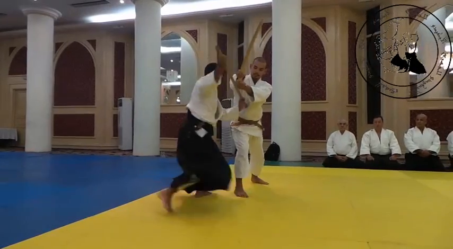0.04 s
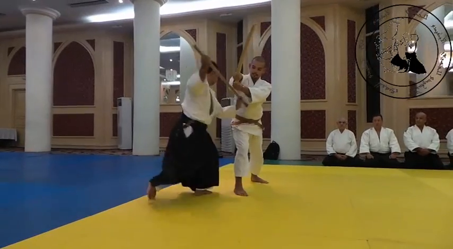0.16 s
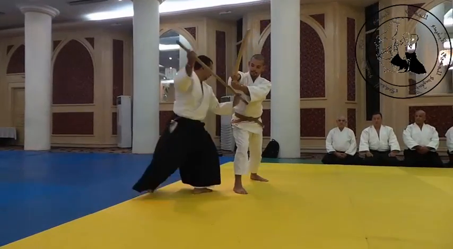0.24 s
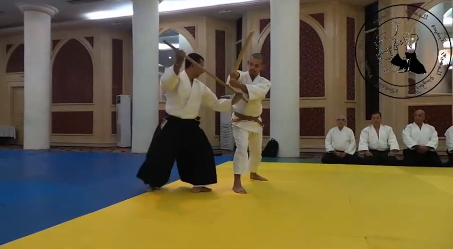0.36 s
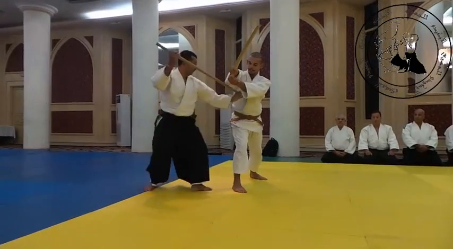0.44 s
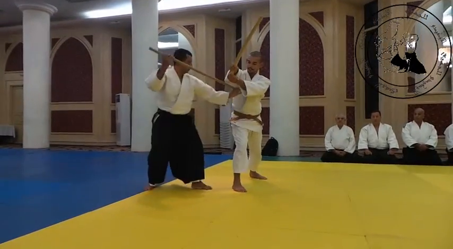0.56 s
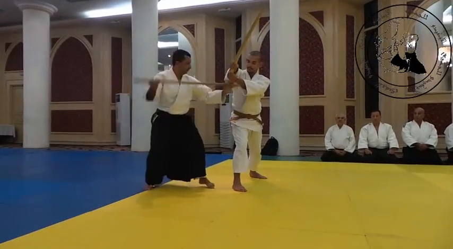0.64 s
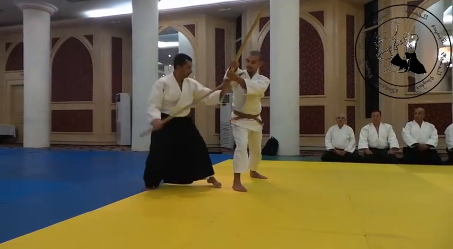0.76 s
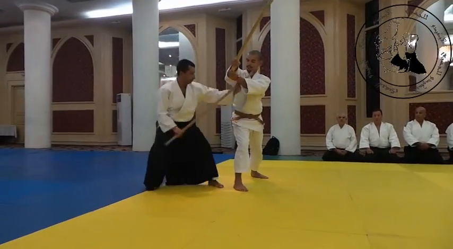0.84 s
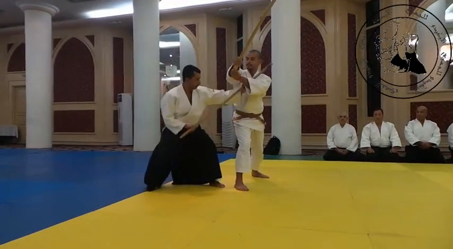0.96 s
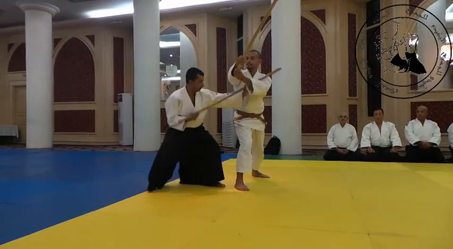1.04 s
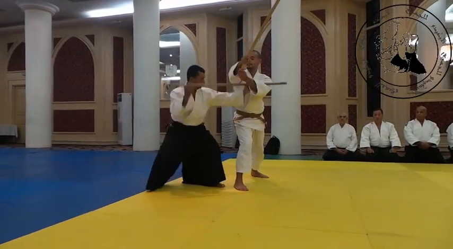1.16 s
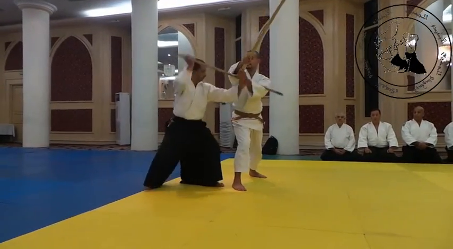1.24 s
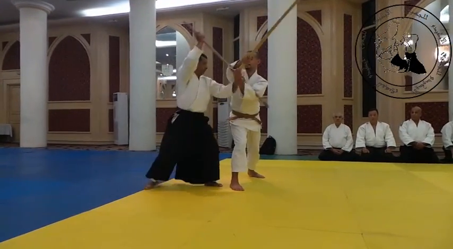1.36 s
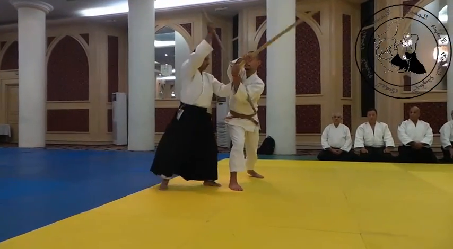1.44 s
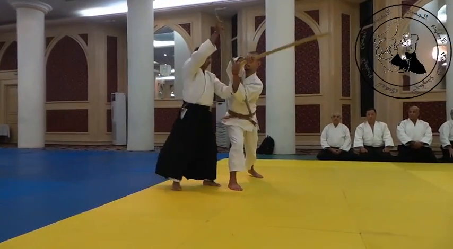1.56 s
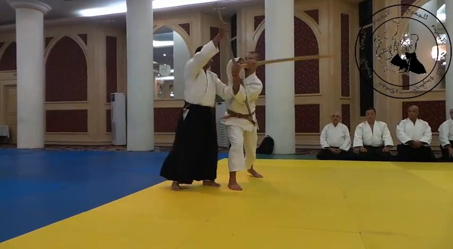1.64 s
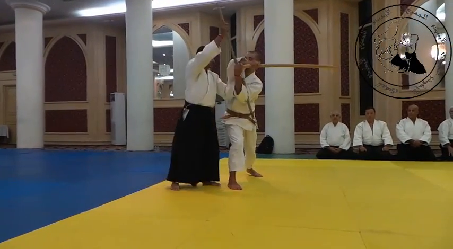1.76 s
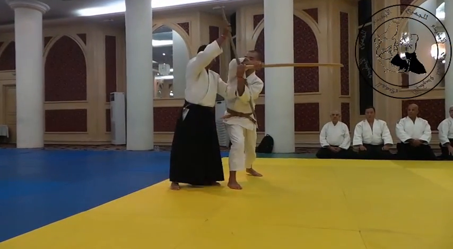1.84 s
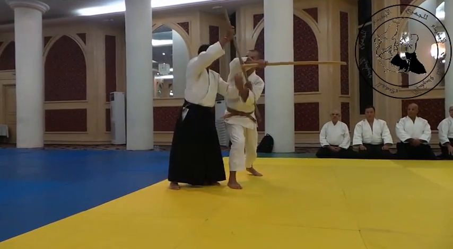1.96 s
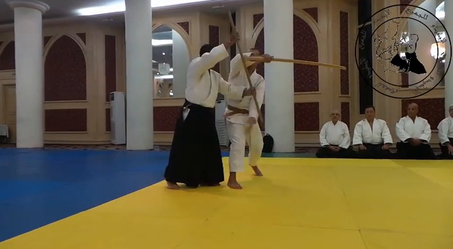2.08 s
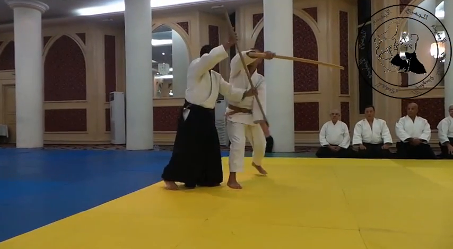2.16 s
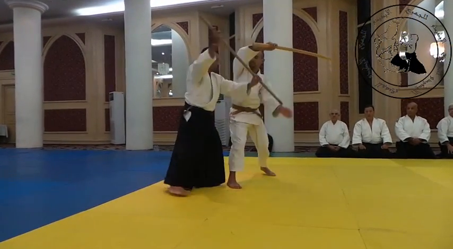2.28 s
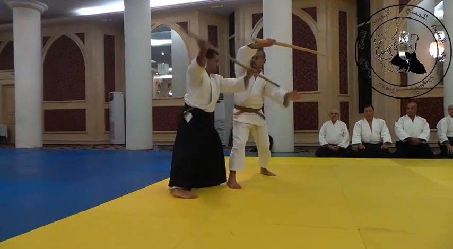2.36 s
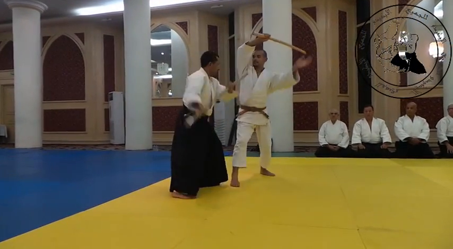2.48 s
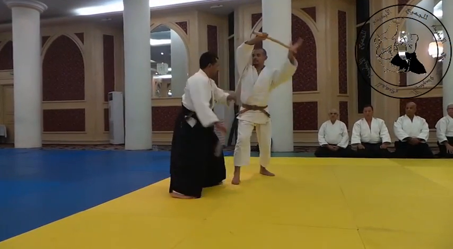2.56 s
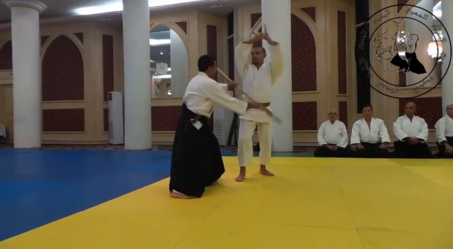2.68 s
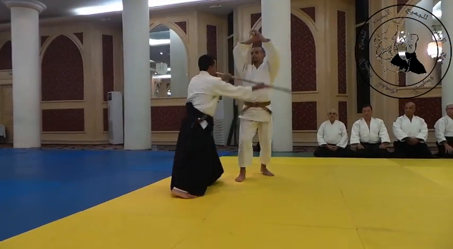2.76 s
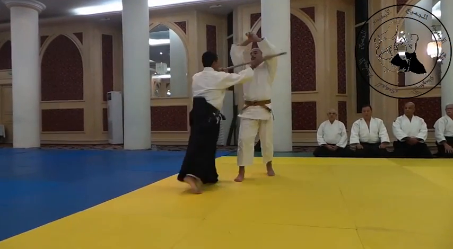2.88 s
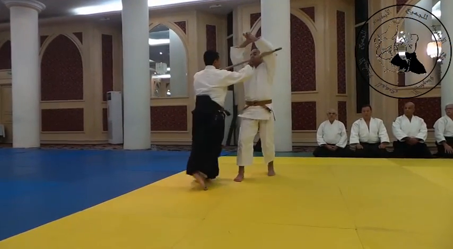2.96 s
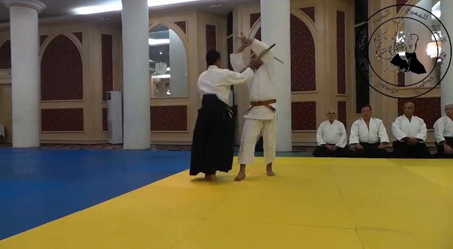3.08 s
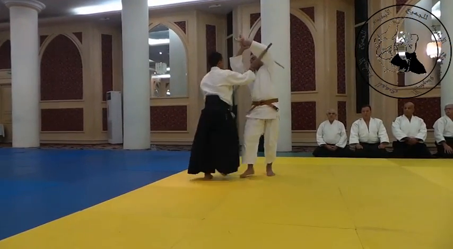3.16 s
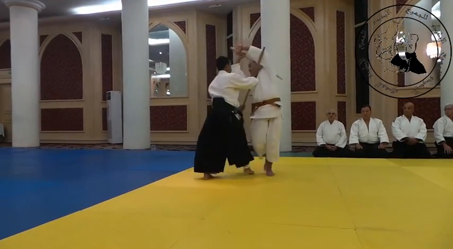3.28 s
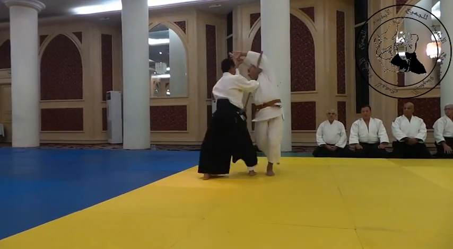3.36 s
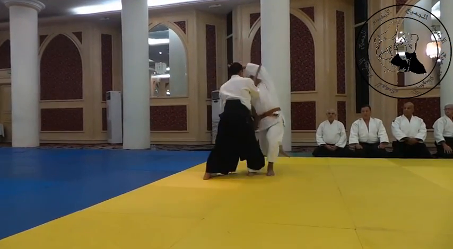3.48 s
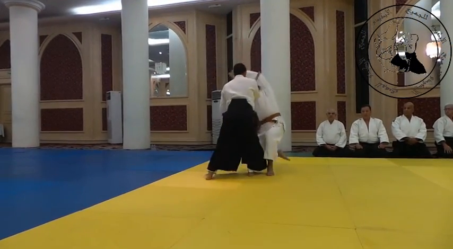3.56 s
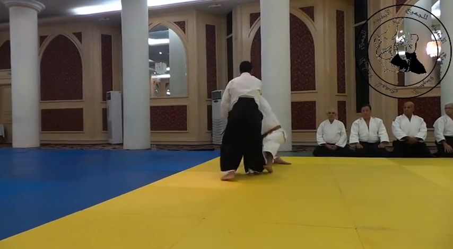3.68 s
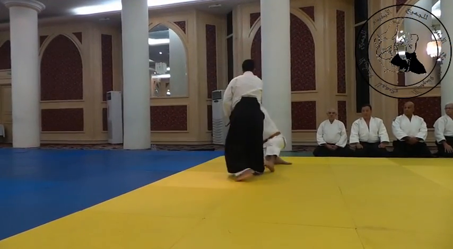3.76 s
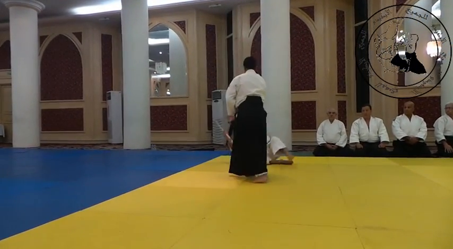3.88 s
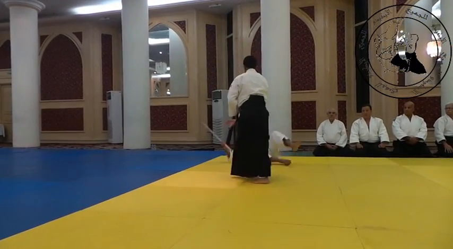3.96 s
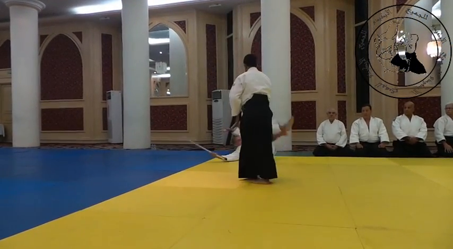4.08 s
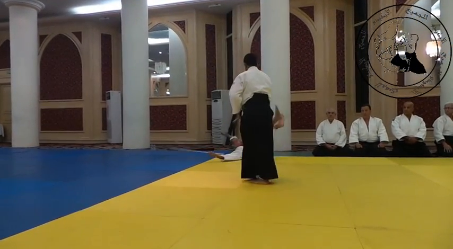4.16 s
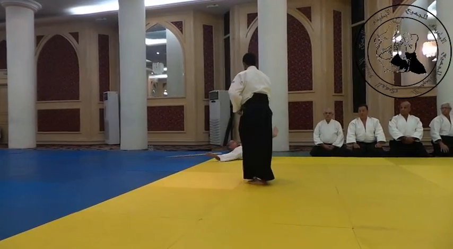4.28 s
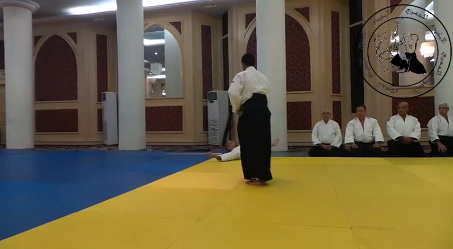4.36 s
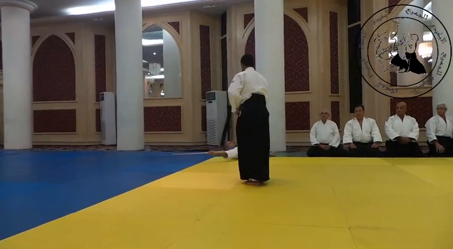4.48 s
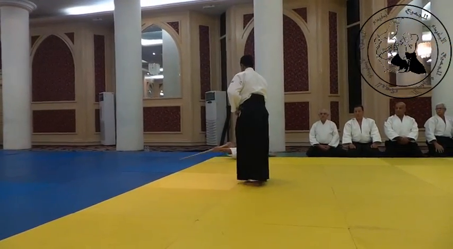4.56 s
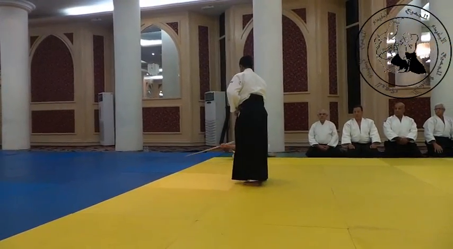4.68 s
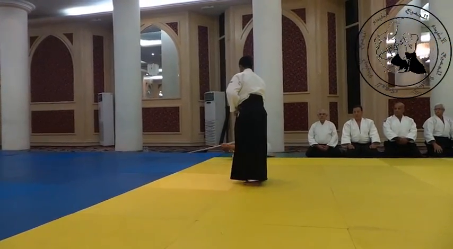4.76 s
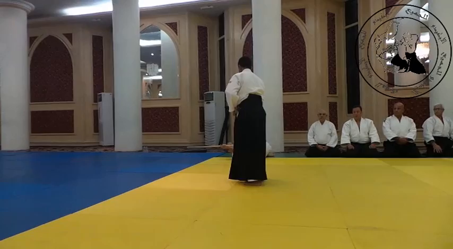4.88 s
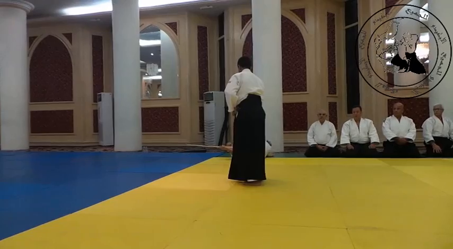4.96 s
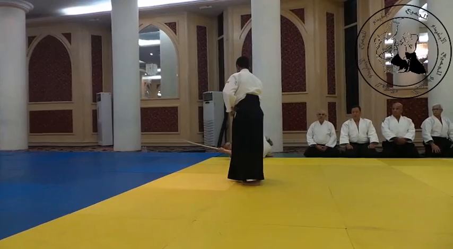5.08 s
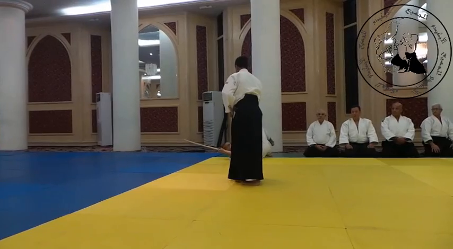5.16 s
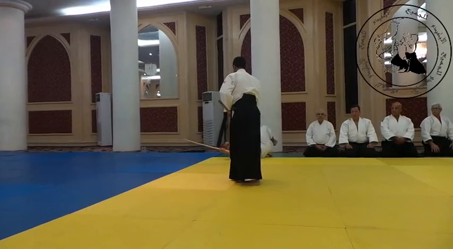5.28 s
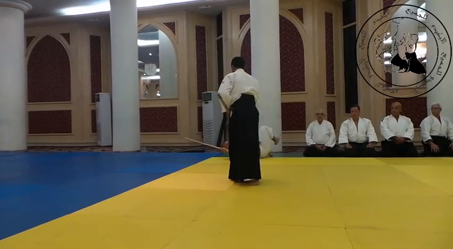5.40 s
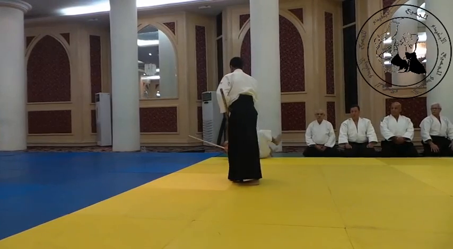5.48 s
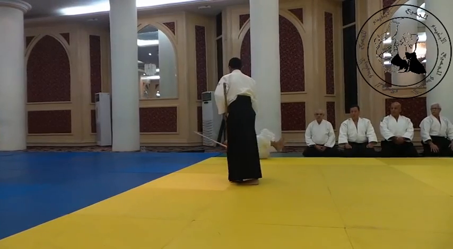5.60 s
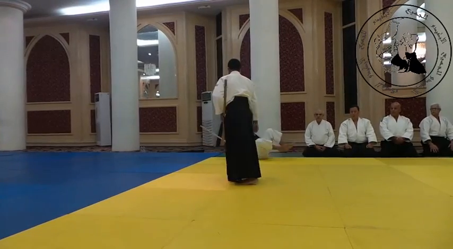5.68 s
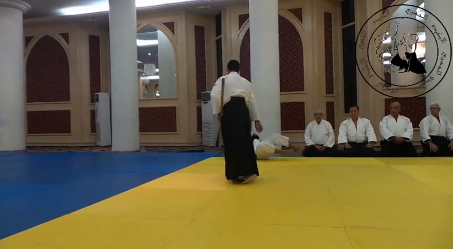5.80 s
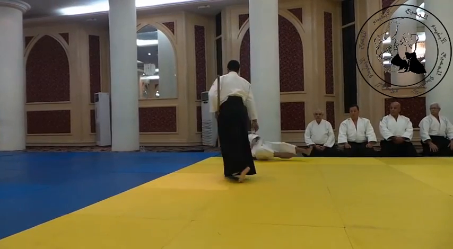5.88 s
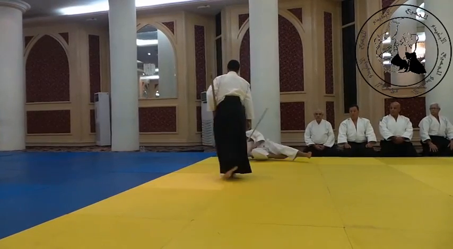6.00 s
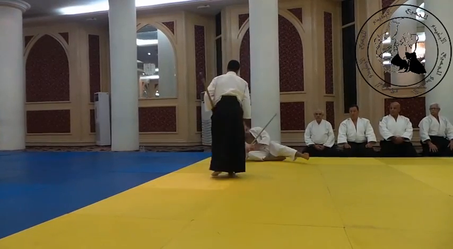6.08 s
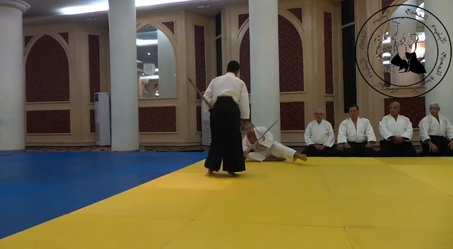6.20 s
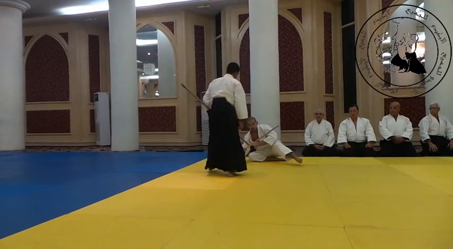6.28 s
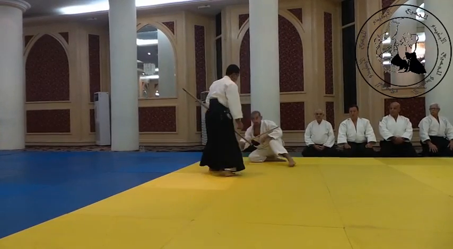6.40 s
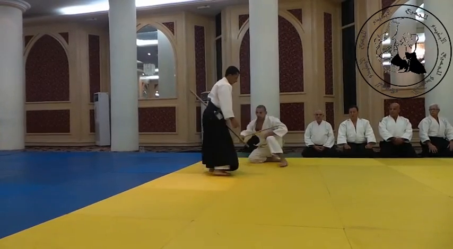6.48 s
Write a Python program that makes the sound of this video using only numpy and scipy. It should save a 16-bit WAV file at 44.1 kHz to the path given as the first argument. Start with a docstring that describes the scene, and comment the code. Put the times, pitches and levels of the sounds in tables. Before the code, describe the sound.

A hard barefoot stamp booms on padded mats, lighter steps and wooden taps follow, then a body falls heavily in a reverberant hall.

```python
"""Staff practice on hall mats

Two people work through a staff technique on padded mats in a large hall, heard from the centre.
Bare feet stamp and step as swinging foam thuds with noisy smacks; soles and cotton rub as swelling noise.
The staffs knock, and once scrape faintly, as short decaying sines. One partner is taken down and lands
flat, in hollow noise bursts. Mains hum made of steady tones and the hall's quiet air, a shaped noise,
lie underneath."""
import sys
import numpy as np
from scipy import signal
from scipy.fft import irfft
from scipy.io import wavfile

SR = 44100
rng = np.random.default_rng(int(sys.argv[2]) if len(sys.argv) > 2 else 0)


def master_out(mix):
    """Clip the mix to full scale and print it as 16-bit PCM to the path in sys.argv[1]."""
    frames = np.transpose(np.atleast_2d(mix))
    ceiling = np.clip(frames, -1, 1)
    pcm = np.round(ceiling * 32767).astype(np.int16)
    wavfile.write(sys.argv[1], SR, pcm)


N = 288403
TIME = np.arange(N) / SR   # seconds

# mains hum, before its waver: pitch_hz, level_db [dB rms]
HUM = [(100, -61.5), (200, -73), (300, -87.5), (500, -88)]
# spectrum of the still air: frequency_hz, relative_level_db
AIR_COLOUR = [(20, -22), (50, -8), (100, -9), (160, -6.5), (290, -9.5), (400, -16.5), (600, -18.5),
              (1000, -24), (2500, -29.5), (6000, -32.5), (14500, -31.5)]
AIR_DB = -66   # rms
# the hall's tail: frequency_hz, reverberant_to_direct_db, t60_s
HALL = [(50, 2, 1.8), (97, 4.5, 1.09), (157, -10, 0.99), (286, 0, 1.04), (550, -0.5, 0.91), (1200, 1, 0.91),
        (2500, -2, 0.81), (6000, -5, 0.83), (14000, -3.5, 0.39)]
# early returns off ceiling and pillars: delay_s, level_db
ECHOES = [(.017, -5), (0.041, -17)]

# light wooden knocks and a faint tonal scrape (at 2.18 s), before the contact softens them:
# start_s, level_db, pitch_hz, t60_s
KNOCKS = [(.541, -48, 739, 0.15), (0.971, -29.5, 1020, 0.0036), (1.508, -57, 1066, 0.021),
          (1.794, -24.5, 1970, 0.0048), (2.183, -59, 1246, 0.078), (5.399, -58.5, 956, .073)]
# bending modes of a staff: multiple_of_pitch [ratio], relative_level_db
WOOD_MODES = [(0.999, 7.5), (2.05, -7), (3.3, -22)]

# sleeves whipping through a quick move: peak_s, level_db, length_s, dull_above_hz
SWISHES = [(0.166, -44, 0.065, 10500), (0.313, -44, .036, 14000), (0.388, -55, 0.048, 10100),
           (2.311, -62.5, 0.029, 9000), (2.658, -59, .07, 4040), (2.783, -53.5, .05, 5130),
           (3.163, -46, 0.037, 10200), (3.24, -66, 0.029, 8000), (3.456, -62.5, 0.023, 10000),
           (4.17, -66, 0.16, 8200), (4.764, -57, 0.032, 7950)]
# soles and heavy cotton rubbing on the mat: peak_s, level_db, length_s, dull_above_hz
SCUFFS = [(0.06, -62.5, 0.17, 5600), (0.094, -48.5, .026, 10000), (.59, -54, 0.071, 5400),
          (0.961, -62, 0.035, 6070), (1.413, -63.5, 0.044, 6000), (2.167, -60.5, 0.054, 7140),
          (2.258, -74, .08, 1900), (2.52, -59, 0.057, 11000), (2.643, -59, 0.082, 6500),
          (3.059, -61.5, 0.24, 8300), (3.347, -64, 0.041, 990), (3.769, -46.5, .045, 6000),
          (3.834, -47, .08, 7900), (3.985, -46, .067, 10100), (4.161, -49.5, .13, 1850),
          (4.413, -50.5, 0.064, 7900), (4.525, -42, 0.12, 6700), (5.296, -74.5, .06, 8050),
          (5.739, -72.5, .06, 6000), (6.143, -67, .12, 4960), (6.241, -59, .07, 4500),
          (6.472, -67.5, 0.092, 7000)]
# spectrum of all rubbing: frequency_hz, relative_level_db
SCUFF_COLOUR = [(100, -24), (300, 18), (700, 9.5), (1200, -1.5), (1800, -0.5), (2600, 0), (4000, -2.5),
                (7000, 0), (15000, 1)]
SWISH_THIN_HZ, SCUFF_THIN_HZ = 1900, 503   # bass rolls off below
RISE_SHARE = 0.4   # part of a rub's length spent speeding up

# spectrum of the dragged sole: frequency_hz, relative_level_db
DRAG_COLOUR = [(200, 0.5), (800, -8.5), (1300, -8.5), (1750, 6.5), (2300, 2.5), (3100, 1.5), (4000, 2),
               (7000, 0.5), (11000, -2.5), (15000, -10.5)]
# one sole gets up to speed, slides on, then slows
DRAG_S, DRAG_DB, DRAG_ATTACK_S, DRAG_HOLD_S, DRAG_RELEASE_S = 1.527, -39, 0.055, 0.12, 0.083
DRAG_STOP_S = 0.36   # about this long after its start the sole comes to rest

# spectrum of skin on the mat cover: frequency_hz, relative_level_db
SLAP_COLOUR = [(100, 18.5), (300, 2.5), (600, 5.5), (1000, 1.5), (1700, -1.5), (2800, 0.5), (4000, -4.5),
               (8000, -5), (15000, -6)]
SMACK_RISE_S, SLAP_THIN_HZ = 0.0009, 89   # time for the skin to settle, and where the bass rolls off
# sharp little ticks of skin and cloth on the cover: start_s, level_db
TICKS = [(2.308, -39.5), (4.384, -26.5), (4.3966, -30), (4.421, -37), (4.743, -35.5), (4.756, -37)]
TICK_RISE_S, TICK_DECAY_S, TICK_DULL_HZ = 0.0001, 0.0012, 10000
# the arm that beats the mat to break the fall
ARM_S, ARM_DB, ARM_DECAY_S = 4.4711, -23.5, 0.0067

# bare feet landing, and the low body of a staff knock (at 0.968 s):
# start_s, thud_db, pitch_hz, smack_db, smack_dull_above_hz
FOOTFALLS = [(.086, -22, 161.3, -48, 9000), (.300, -34.5, 112, -49, 12000), (.445, -33.5, 102.4, -50, 3000),
             (.538, -39.5, 113, -45.5, 2980), (.945, -47, 124, -52, 5900), (.968, -53, 172, -51, 1500),
             (1.792, -43.5, 171, -48.5, 1200), (2.1775, -68, 170, -40.5, 2420),
             (2.272, -45, 179, -52, 1300), (2.426, -35.5, 143, -57, 1000),
             (2.495, -36.5, 183, -38.5, 13000), (2.509, -32.5, 142, -48, 10000),
             (2.909, -38, 127, -55, 1500), (2.988, -43, 152, -46.5, 9000), (3.049, -39.5, 176, -45, 2950),
             (3.141, -34.5, 145.6, -43, 7000), (3.245, -50.5, 137, -63, 4000),
             (3.342, -42.5, 181, -50, 900), (3.405, -42, 170, -45, 1500),
             (6.226, -35.5, 107.4, -39.5, 8800)]
# knees, hip, back and legs of the falling partner: start_s, thud_db, pitch_hz, smack_db, smack_dull_above_hz
BODY_BLOWS = [(3.7505, -14, 143.7, -30.5, 6060), (3.825, -31.5, 155, -41.5, 8950),
              (3.858, -24, 149, -43, 4000), (4.049, -28, 281, -37.5, 1100),
              (4.143, -23.5, 151.4, -41, 3500), (4.157, -38, 198, -46, 3000),
              (4.177, -26, 174, -46.5, 2500), (4.385, -19.5, 150.5, -40, 6000),
              (4.419, -21.5, 151, -43, 6000), (4.446, -22, 169, -47, 3000),
              (4.4625, -11, 138.3, -40.5, 2920), (4.490, -15.5, 154, -27, 6000),
              (4.554, -19, 130.7, -41, 3000)]
# the foam's second mode: multiple of the pitch, and loss in dB per octave of pitch above MAT_HZ
OVERTONE, OVERTONE_LOSS_DB, MAT_HZ = 2.04, 18.5, 140

# the whole sole stamped flat: its clap, then the settings of the thud under it
STAMP_S, STAMP_DB, STAMP_DECAY_S = 0.1093, -16.5, 0.0033
STAMP_THUD_S, STAMP_THUD_DB, STAMP_HZ = 0.1076, -11, 133.6
# spectrum of the stamp's clap: frequency_hz, relative_level_db
STAMP_COLOUR = [(100, 7), (200, 13), (290, 2), (440, -3), (600, 20.5), (740, 2.5), (900, 1), (1200, -11),
                (1700, 0.5), (2200, 4.5), (2700, 5.5), (3600, 0.5), (6000, -0.5), (15000, -11.5)]

# back and arms falling flat, squeezing out the air beneath: start_s, level_db, decay_s
FALL = [(4.4598, -16.5, 0.0056), (4.472, -21.5, 0.029), (4.522, -27.5, 0.019), (4.555, -22.5, 0.0026),
        (4.640, -26.5, 0.0047)]
# spectrum of the flat landing: frequency_hz, relative_level_db
FALL_COLOUR = [(100, -31), (200, 1.5), (275, 2.5), (400, -7.5), (490, 3), (570, 7.5), (700, -4),
               (900, -26.5), (1200, -19.5), (1550, -12), (2000, -18.5), (2600, -27.5), (4000, -21),
               (14000, -32.5)]

CUTOFF_HZ = 14750   # the top is cut above


def from_db(db):
    """Turn decibels into gain."""
    return 10 ** (np.asarray(db) / 20)


def at_hz(points, hz, column=1):
    """Read a table column on a log-frequency axis."""
    points = np.array(points)
    return np.interp(np.log(hz + 1e-9), np.log(points[:, 0]), points[:, column])


def noise(colour, size, thin_hz=0, dull_hz=np.inf):
    """Random-phase noise of rms 1 with the given spectrum, rolled off below thin_hz and above dull_hz."""
    hz = np.fft.rfftfreq(size, 1 / SR)
    rolloff = np.sqrt(1 + (hz / dull_hz) ** 4 + (thin_hz / (hz + 1)) ** 4)
    gain = from_db(at_hz(colour, hz)) / rolloff * (hz > 0)   # nothing at 0 Hz
    x = irfft(gain * np.exp(2j * np.pi * rng.random(len(hz))), size)
    return x / np.std(x)


def add(track, s, sound):
    """Mix a sound into the track from time s on."""
    start = max(round(s * SR), 0)
    track[start:start + len(sound)] += sound[:N - start]


def background():
    """Mains hum, steady tones that waver slightly in level, over the shaped noise of still air."""
    hum = np.zeros(N)
    for hz, db in HUM:
        hum += from_db(db) * np.sqrt(2) * np.sin(2 * np.pi * (hz * TIME + rng.random()))
    waver_db = np.interp(TIME, np.linspace(0, TIME[-1], 70), rng.standard_normal(70))
    return hum * from_db(waver_db) + from_db(AIR_DB) * noise(AIR_COLOUR, N)


def hall(x, gap_s=0.01, build_s=0.017):
    """Diffuse reflections build up after a short gap and die away band by band."""
    t = TIME[:3 * SR // 2]
    hz = np.fft.rfftfreq(len(t), 1 / SR)
    white = np.exp(2j * np.pi * rng.random(len(hz)))
    onset = 1 - np.exp(-np.maximum(t - gap_s, 0) / build_s)
    edges = np.geomspace(30, 16000, 19)
    tail = np.zeros(len(t))
    for low, high in zip(edges, edges[1:]):
        centre = np.sqrt(low * high)
        decay = from_db(-60 * t / at_hz(HALL, centre, 2))
        band = irfft(white * ((hz >= low) & (hz < high)), len(t)) * onset * decay
        # scale the band's energy to the table's reverberant-to-direct level
        unit_energy = np.sqrt(2 * (high - low) / SR / np.sum(band ** 2))
        tail += band * from_db(at_hz(HALL, centre)) * unit_energy
    return signal.fftconvolve(x, tail)[:N]


def early_echoes(x, dull_hz=3500):
    """The nearest surfaces throw the sound back, later and duller."""
    dulled = signal.sosfilt(signal.butter(1, dull_hz, fs=SR, output="sos"), x)
    return sum(from_db(db) * np.interp(TIME - delay, TIME, dulled, left=0) for delay, db in ECHOES)


def staffs(contact_s=0.0013):
    """A gripped staff, touched softly, rings briefly in a few bending modes; the faint scrape is made alike."""
    out = np.zeros(N)
    t = TIME[:SR // 4]
    contact = 1 - np.exp(-t / contact_s)
    for s, db, hz, t60 in KNOCKS:
        for multiple, mode_db in WOOD_MODES:
            ring = np.sin(2 * np.pi * hz * multiple * t)
            add(out, s, contact * from_db(db + mode_db - 60 * t / t60) * ring)
    return out


def grain(size, depth_db):
    """Friction catches and lets go: a random gain, redrawn every millisecond or two."""
    catches = rng.standard_normal(size // 64 + 2)
    return from_db(depth_db * np.interp(np.arange(size) / 64, np.arange(len(catches)), catches))


def rub(peak_s, length, thin_hz, dull_hz):
    """Rubbing swells and fades with the speed of the move; returns its start time and its sound."""
    start = max(peak_s - 3 * RISE_SHARE * length, 0)
    since_peak = TIME[:2 * SR // 3] + start - peak_s
    spread = length * np.where(since_peak < 0, RISE_SHARE, 1 - RISE_SHARE)
    speed = np.exp(-0.5 * (since_peak / spread) ** 2)
    return start, speed * noise(SCUFF_COLOUR, len(speed), thin_hz, dull_hz)


def swishes_and_scuffs():
    """Thin swishes of sleeves and fuller scuffs on the mat, made grainy by friction."""
    out = np.zeros(N)
    for rows, thin_hz in [(SWISHES, SWISH_THIN_HZ), (SCUFFS, SCUFF_THIN_HZ)]:
        for peak_s, db, length, dull_hz in rows:
            start, sound = rub(peak_s, length, thin_hz, dull_hz)
            add(out, start, from_db(db) * sound)
    return out * grain(N, depth_db=2.0)


def drag():
    """A sole hisses over the textured cover, louder the faster it slides."""
    t = np.maximum(TIME - DRAG_S, 0)
    attack = 1 - np.exp(-t / DRAG_ATTACK_S)
    release = np.exp(-np.maximum(t - DRAG_HOLD_S, 0) / DRAG_RELEASE_S)
    stop = np.exp(-(t / DRAG_STOP_S) ** 8)
    return from_db(DRAG_DB) * attack * release * stop * noise(DRAG_COLOUR, N)


def slap(rise_s, decay_s, dull_hz):
    """Skin meets the mat cover in a noisy crack a few milliseconds long."""
    t = TIME[:SR // 10]
    envelope = (1 - np.exp(-t / rise_s)) * np.exp(-t / decay_s)
    return envelope * noise(SLAP_COLOUR, len(t), SLAP_THIN_HZ, dull_hz)


def cracks(arm_dull_hz=9000):
    """The arm's broad slap and the small ticks, which carry no weight and so no thud."""
    out = np.zeros(N)
    add(out, ARM_S, from_db(ARM_DB) * slap(SMACK_RISE_S, ARM_DECAY_S, arm_dull_hz))
    for s, db in TICKS:
        add(out, s, from_db(db) * slap(TICK_RISE_S, TICK_DECAY_S, TICK_DULL_HZ))
    return out


def thud(hz, swell_cycles, overtone_db):
    """Weight sinks into the foam, which swings for a few cycles, with a shorter, higher second mode."""
    cycles = hz * TIME[:SR // 4]
    push = (cycles / swell_cycles * np.exp(1 - cycles / swell_cycles)) ** 1.8   # peaks at swell_cycles
    turn = 2 * np.pi * cycles
    overtone = from_db(overtone_db - OVERTONE_LOSS_DB * np.log2(hz / MAT_HZ))
    return -(push * np.sin(turn) + overtone * push ** 2 * np.sin(OVERTONE * turn))


def blows(rows, swell_cycles, sink_per_db, overtone_db, smack_s):
    """Each blow thuds in the foam, longer the heavier it is, and smacks the cover; returns both tracks."""
    low, smack = np.zeros((2, N))
    usual_db = np.mean([row[1] for row in rows])
    for s, thud_db, hz, smack_db, dull_hz in rows:
        swell = swell_cycles * np.exp(sink_per_db * (thud_db - usual_db))
        add(low, s, from_db(thud_db) * thud(hz, swell, overtone_db))
        add(smack, s, from_db(smack_db) * slap(SMACK_RISE_S, smack_s, dull_hz))
    return np.array([low, smack])


def claps(rows, colour, contact_s):
    """A broad surface lands flat and traps air, which gives the blow a hollow colour."""
    out = np.zeros(N)
    t = TIME[:SR // 2]
    for s, db, decay in rows:
        envelope = (1 - np.exp(-t / contact_s)) * np.exp(-t / decay)
        add(out, s, from_db(db) * envelope * noise(colour, len(t)))
    return out


def scene():
    """Feet strike briefly, the body sinks in for longer; all share the hall."""
    wood, cloth, slide = staffs(), swishes_and_scuffs(), drag()
    feet = blows(FOOTFALLS, swell_cycles=0.6, sink_per_db=0.11, overtone_db=-12.5, smack_s=0.0046)
    trunk = blows(BODY_BLOWS, swell_cycles=0.91, sink_per_db=0.07, overtone_db=-19, smack_s=0.0057)
    low, smack = feet + trunk
    stamp_thud = thud(STAMP_HZ, swell_cycles=0.64, overtone_db=-6.5)
    add(low, STAMP_THUD_S, from_db(STAMP_THUD_DB) * stamp_thud)
    stamp_clap = claps([(STAMP_S, STAMP_DB, STAMP_DECAY_S)], STAMP_COLOUR, contact_s=0.00021)
    smack = smack + cracks() + stamp_clap
    body = claps(FALL, FALL_COLOUR, contact_s=0.0017)

    direct = low + smack + body + cloth + slide + wood
    # how strongly each source excites the hall
    sent = from_db(-2.0) * low + from_db(-1.5) * smack + from_db(-1.5) * body
    sent += from_db(-5.5) * cloth + from_db(-22.5) * slide + from_db(-21.0) * wood
    mid = direct + early_echoes(sent) + hall(sent) + background()
    side = from_db(-30) * smack   # a faint difference between the channels
    return np.array([mid - side, mid + side])


def record(dry, low_cut_hz=55):
    """The microphone thins the deepest bass; the top is cut steeply."""
    thinned = signal.sosfilt(signal.butter(2, low_cut_hz, "high", fs=SR, output="sos"), dry)
    return signal.sosfilt(signal.ellip(12, 0.1, 80, CUTOFF_HZ, fs=SR, output="sos"), thinned)


dry = scene()
out = record(dry)
master_out(out)
```